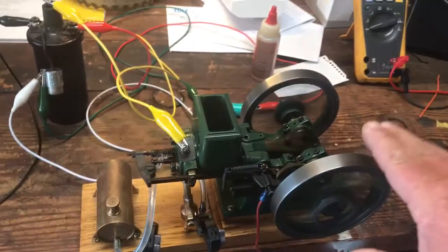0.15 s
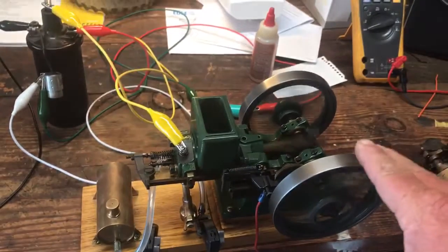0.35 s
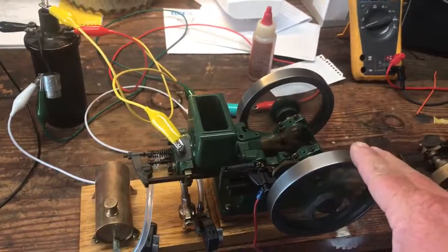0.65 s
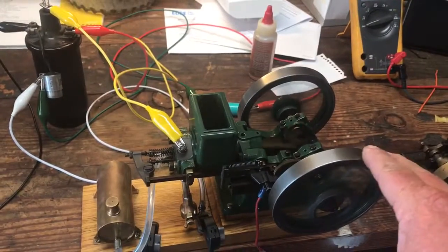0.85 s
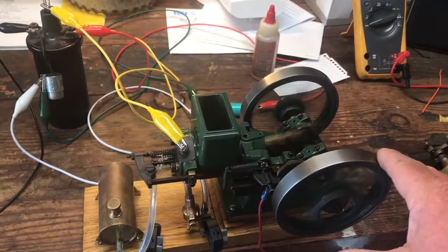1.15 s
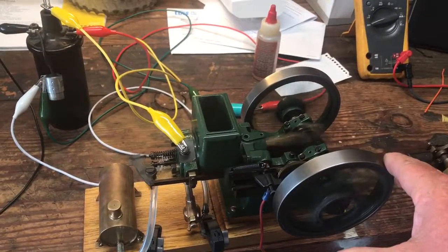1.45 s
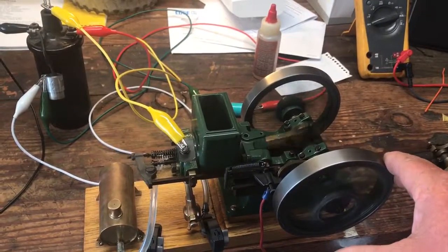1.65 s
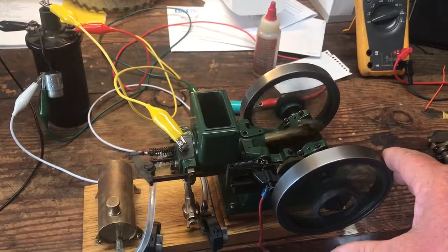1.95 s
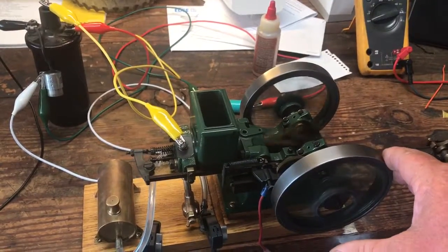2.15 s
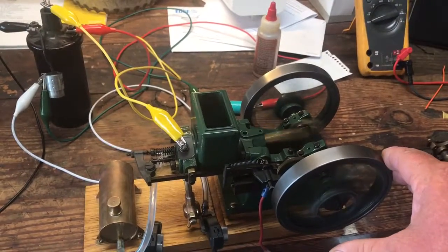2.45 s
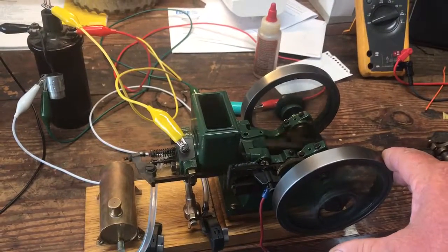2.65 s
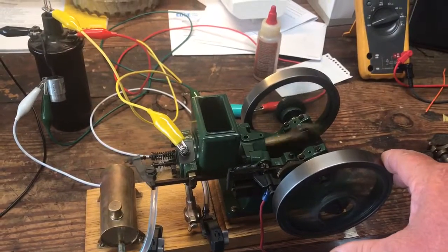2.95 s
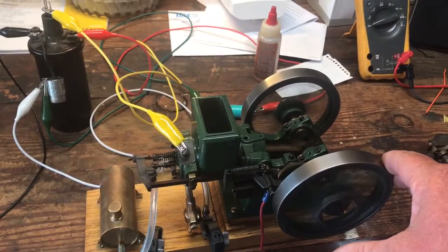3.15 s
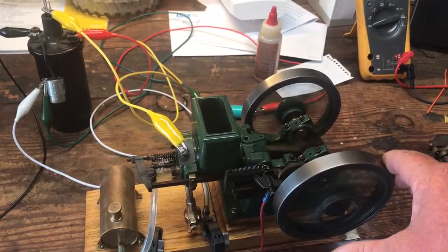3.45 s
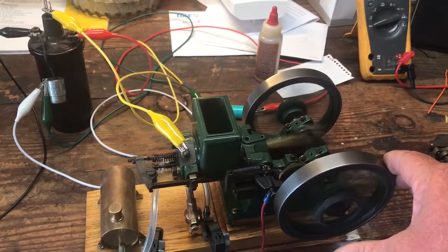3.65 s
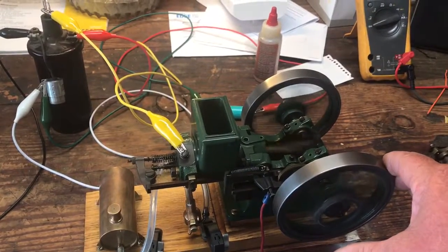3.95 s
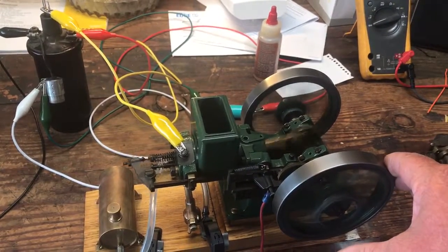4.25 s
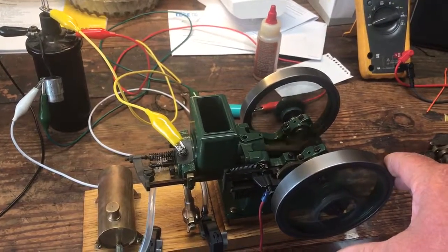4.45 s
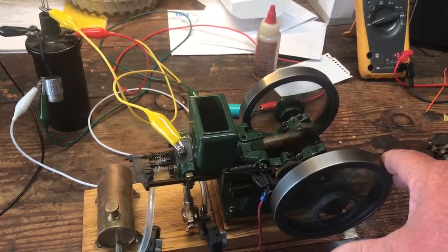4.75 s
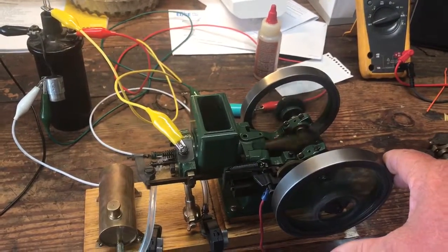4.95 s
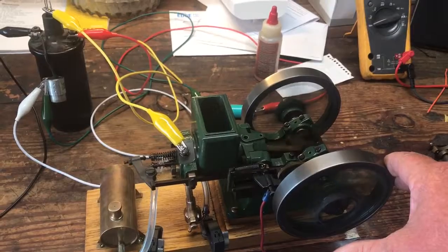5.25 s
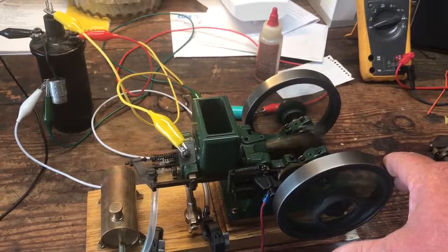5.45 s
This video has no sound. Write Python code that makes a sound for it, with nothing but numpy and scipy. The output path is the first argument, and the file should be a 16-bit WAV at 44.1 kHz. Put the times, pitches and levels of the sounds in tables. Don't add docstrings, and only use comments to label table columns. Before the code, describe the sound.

Close phone pickup in a small, dry workshop: a little hit-and-miss gas engine already turning on a wooden bench. From 0 s, hard metallic clacks arrive about every 0.11 s, each trailed some 25 ms later by a softer valve seating, with light loose ticks between. At 0.7 s comes the first firing: a very short, bright, hissing double puff with a piston knock and a low bench-and-pipe thump. The next is at 1.25 s, then 1.6, 1.9 and 2.15 s, and so on roughly every 0.22-0.35 s to 5.4 s, varying slightly in strength. Near 3.3 s and 5.56 s the latch slips with an extra rattly clack and a weak thump; another weak thump comes at 3.38 s. Throughout, the piston breathes falling chuffs and faint rising whistles, an intake valve hums briefly after firings, and grainy gear whirr, thin high hiss and quiet rumble continue until it cuts off, still running, around 5.6 s.

```python
import sys
import numpy as np
from scipy import signal
from scipy.fft import rfft, irfft
from scipy.io import wavfile
from scipy.ndimage import uniform_filter1d

SR = 44100
rng = np.random.default_rng(int(sys.argv[2]) if len(sys.argv) > 2 else 0)


def bounce(signal):
    frames = np.transpose(np.atleast_2d(signal))
    limited = np.clip(frames, -1, 1)
    pcm = np.round(limited * 32767).astype(np.int16)
    wavfile.write(sys.argv[1], SR, pcm)


def convert_level_to_amplitude(level_db):
    exponent = np.asarray(level_db, float) / 20
    return 10 ** exponent


N = 246947


def evened(x):
    return x / np.sqrt(np.mean(x ** 2) + 1e-20)


def read(points, hz):
    f, value = np.transpose(points)
    return np.interp(np.log(hz + 1), np.log(f + 1), value)


def add(mix, s, sound):
    part = mix[..., round(s * SR):][..., :sound.shape[-1]]
    part += sound[..., :part.shape[-1]]


def swell(rise_s, fall_s, length=4000):
    t = np.arange(length) / SR
    shape = (1 - np.exp(-t / rise_s)) ** 2 * np.exp(-t / fall_s)
    return shape / shape.max()


def band(x, lo_hz, hi_hz):
    return signal.sosfilt(signal.butter(4, [lo_hz, hi_hz], "band", fs=SR, output="sos"), x)


def coloured(points):
    length = N + N % 2
    spectrum = rfft(rng.standard_normal(length))
    spectrum *= convert_level_to_amplitude(read(points, np.fft.rfftfreq(length, 1 / SR)))
    return evened(irfft(spectrum)[:N])


def modes(table, length=12000):
    t = np.arange(length) / SR
    return sum(convert_level_to_amplitude(db - 60 * t / t60) * np.sin(2 * np.pi * hz * t) for hz, db, t60 in table)


# (time [s], first puff [dB], second puff [dB], thump [dB])
FIRINGS = [(0.7047, -7.5, -11, -29.5), (1.2472, -7, -12.5, -28.5), (1.5827, -9, -11, -30),
           (1.9287, -6.5, -12.5, -28.5), (2.1517, -7, -11, -28), (2.4811, -8.5, -12.5, -27.5),
           (2.816, -7, -12.5, -28.5), (3.1549, -11.5, -12.5, -26.5), (3.5082, -8, -12, -28),
           (3.735, -13, -10.5, -28.5), (4.0677, -10.5, -11, -27.5), (4.4018, -6.5, -13.5, -27.5),
           (4.7377, -8, -11.5, -29), (5.0745, -7, -12, -27.5), (5.4174, -11, -10.5, -27.5)]
# (time [s], level [dB])
THUMPS = [
    (3.3055, -15),
    (3.3815, -11),
    (5.561, -15),
]
# (pitch [Hz], level per Hz [dB])
JET = [(590, -5.5), (1000, -5.5), (2770, -4.5), (4540, 1.5), (6380, -3), (8360, -2), (10100, -8),
       (11600, -0.5), (15400, -2), (15900, 10), (16500, -22)]


def exhaust():
    first, second, low, rumble = np.zeros((4, N))
    thump = convert_level_to_amplitude(8.5) * gas_swing()
    first_puff = swell(.0007, .0016)
    blow_down = convert_level_to_amplitude(-15) * swell(0.00088, 0.026)
    second_puff = swell(0.00071, 0.0024) + blow_down
    for s, first_db, second_db, thump_db in FIRINGS:
        add(first, s - .0001, convert_level_to_amplitude(first_db) * first_puff)
        add(second, s + 0.0035, convert_level_to_amplitude(second_db) * second_puff)
        add(low, s - .008, -convert_level_to_amplitude(thump_db - 4.5) * np.hanning(250))
        add(low, s + .0017, convert_level_to_amplitude(thump_db) * thump)
        add(rumble, s + 0.0047, convert_level_to_amplitude(thump_db - 13.5) * swell(0.0025, 0.038, 9000))
    for s, db in THUMPS:
        add(low, s, convert_level_to_amplitude(db) * np.diff(thump[:330]))
    low += rumble * evened(band(rng.standard_normal(N), 77, 274))
    gusts = evened(uniform_filter1d(rng.standard_normal(N), 40))
    jet = coloured(JET) * convert_level_to_amplitude(1.35 * gusts - 2)
    thin_jet = 0.45 * jet + 0.8 * band(jet, 4050, 16700)
    return first * jet + second * thin_jet + low + piston_knocks()


def piston_knocks():
    rows = [(s + 0.00208, db, 5, -9) for s, _, _, db in FIRINGS]
    knock = contact_forces(rows, swell(0.00011, 0.00059), likeness=1.0)
    return frame(*knock, ring_db=[-3] * 3, click_db=[1.5] * 3, tail_db=[-1.5] * 3)


# (pitch [Hz], level against the gas swing [dB], time to fall 60 dB [s])
CHEST = [
    (75.6, -13.5, .25),
    (106.5, -8.5, 0.15),
    (168, -38, 0.16),
    (223, -16.5, 0.06),
]
# (pitch [Hz], peak against the gas swing [dB], rise [s], fall [s])
PIPE = (518, -5, .0025, .0042)
# (time [s], level [dB])
WALLS = [
    (0.02, -25),
    (.034, -25),
    (.047, -18),
]


def gas_swing():
    swing_hz = 245
    t = np.arange(round(1.5 * SR / swing_hz)) / SR
    swing = -np.sin(2 * np.pi * swing_hz * t) * np.linspace(.75, 1.05, len(t))
    out = np.zeros(17000)
    add(out, 0, swing)
    add(out, .0046, -modes(CHEST, 16000))
    hz, db, rise_s, fall_s = PIPE
    pipe_tone = np.sin(2 * np.pi * hz * np.arange(4000) / SR)
    add(out, .0007, -convert_level_to_amplitude(db) * swell(rise_s, fall_s) * pipe_tone)
    dull = band(out, 70, 321)
    for s, db in WALLS:
        add(out, s, convert_level_to_amplitude(db) * dull)
    return out


def valve_gear():
    hard = contact_forces(clacks(), swell(.0002, .0008), likeness=.6)
    soft = contact_forces(rattles(), swell(.0005, .0018), likeness=.3)
    hard_ring = frame(*hard, ring_db=[6, 1.5, -8], click_db=[4, 4, .6], tail_db=[3, -1.5, -4])
    soft_ring = frame(*soft, ring_db=[-1.5, -5, -11], click_db=[3, 1.5, -3], tail_db=[-3, -5, -7])
    return hard_ring + soft_ring


# (time [s], clack [dB], valve seating delay [ms], seating [dB])
CLACKS = [(0.0448, -19, 25, -28), (0.1491, -17.5, 23.5, -27), (0.2541, -19, 27, -25.5),
          (0.3646, -19.5, 25, -23), (0.4761, -19, 25.5, -26), (.8046, -21, 25.4, -36),
          (.908, -19, 24.5, -24.5), (1.016, -19.5, 26, -25.5), (1.3524, -19, 26, -27),
          (1.69, -23, 26.7, -26.5), (2.255, -22.5, 25, -26.5), (2.586, -18.5, 26.5, -26),
          (2.9214, -21, 27, -28), (3.2638, -20, 30, -27), (3.84, -22, 27, -25), (4.1734, -21, 25, -26.5),
          (4.5075, -21, 27, -25), (4.8439, -20.5, 26.5, -24.5), (5.1812, -20, 27, -27),
          (5.5274, -21, 24.9, -44)]
# (time [s], clack [dB], valve seating delay [ms], seating [dB])
CHARGES = [(.5902, -19, 28.4, -29), (1.13, -20.5, 25.8, -37), (1.4649, -20, 26.5, -33),
           (1.8058, -19, 26.7, -38), (2.0379, -21.5, 30.3, -27.5), (2.3668, -19.5, 24.8, -28.5),
           (2.6982, -19.5, 26.2, -31), (3.0357, -20.5, 26.3, -36), (3.3816, -45, 35.8, -40),
           (3.6194, -20, 27.1, -34), (3.9525, -18.5, 25.6, -31.5), (4.2858, -18.5, 25, -29.5),
           (4.6196, -19, 27.2, -33), (4.956, -20, 26.3, -32), (5.2958, -19.5, 27.2, -33.5)]
# (time [s], middle ring [dB], low ring against it [dB], high ring against it [dB])
SLIPS = [
    (3.3062, -29, -12, 3),
    (3.3093, -14.5, -14, 4),
    (3.3135, -21, -6, 0),
    (3.3807, -44, 6, 13),
    (5.5615, -31, -8, 3),
    (5.5641, -16.5, -7, 6),
]


def clacks():
    coast_colour, charge_colour = (-4, 0.78), (-5, 0.49)
    coasting = [(s, db, *coast_colour) for s, db, *_ in CLACKS]
    charging = [(s, db, *charge_colour) for s, db, *_ in CHARGES]
    return sorted(coasting + charging + SLIPS)


RATTLES = {"coasting": [(.59, -56, 4, -4), (.655, -45.5, 6, 9.5), (.91, -53, 0, 16)],
           "charging": [(.2, -50, -8, 0), (.55, -40, -3, -14), (.76, -48.5, 6, -8), (.807, -42, 10.5, 5)],
           "firing": [(.662, -37.5, 1, 1.6), (.91, -48, -9, 6.1)]}


def rattles():
    cold_seat, hot_seat, charge_seat, fired_seat = (-3.5, -2.1), (-10, -3), (3.5, .6), (-5, -5)
    fired_lag_s, fired_seat_db = 0.0265, -25.5
    bounce_s, bounce_db = 0.0046, -6
    fired_s = np.array([row[0] for row in FIRINGS])
    seats = [(s + fired_lag_s, fired_seat_db, *fired_seat) for s in fired_s]
    for s, _, lag_ms, db in CLACKS:
        hot = np.any((s > fired_s) & (s < fired_s + .15))
        seats.append((s + lag_ms / 1000, db, *(hot_seat if hot else cold_seat)))
    for s, _, lag_ms, db in CHARGES:
        seat_s = s + lag_ms / 1000
        seats.append((seat_s, db, *charge_seat))
        seats.append((seat_s + bounce_s, db + bounce_db, *charge_seat))

    turns, ticks = cam_turns()[0], []
    for kind, table in (("coasting", CLACKS), ("charging", CHARGES), ("firing", FIRINGS)):
        opened = np.round(turns[[round(row[0] * SR) for row in table]])
        for share, *levels in RATTLES[kind]:
            ticks += [(at / SR, *levels) for at in np.searchsorted(turns, opened + share)]
    ticks = ticks + rng.standard_normal((len(ticks), 4)) * [0.0011, 0.5, 0.5, 0.5]
    seats = seats + rng.standard_normal((len(seats), 4)) * [0, 0, 0.4, 0.4]
    return np.concatenate([seats, ticks])


def contact_forces(rows, shape, likeness):
    envelope, same = np.zeros((3, N)), np.zeros((3, N))
    pattern = rng.standard_normal(len(shape))
    for s, mid_db, low_db, high_db in rows:
        blow = convert_level_to_amplitude(mid_db + np.array([[low_db], [0], [high_db]])) * shape
        add(envelope, s, blow)
        add(same, s, blow * pattern)
    fresh = envelope * rng.standard_normal(N)
    return envelope, likeness * same + np.sqrt(1 - likeness ** 2) * fresh


RING_EDGES_HZ = [800, 2500, 7000, 16000]
# (pitch [Hz], level [dB], time to fall 60 dB [s])
FRAME = [(961, 4.5, 0.19), (1159, 7, 0.19), (1474, 10.5, 0.21), (1541, 22.5, 0.049), (1694, 18.5, 0.06),
         (1750, 25.5, 0.019), (2170, 19.5, 0.017), (2493.5, 20.5, 0.02), (2680, 17.5, 0.012),
         (2950, 8, 0.019), (3900, -12, 0.046), (3687, 11, 0.05), (3974, 17, 0.023), (4200, 13, 0.035),
         (5460, 18.5, 0.0061), (5980, 12, 0.014), (8960, -22, 0.013), (9550, 13, 0.039),
         (11500, 17.5, 0.018), (13100, 22.5, 0.011)]
# (pitch [Hz], level per Hz [dB])
SCATTER = [(290, -44), (500, -47), (1120, 0), (1290, -9), (1480, 3.5), (2260, -8.5), (2460, -9),
           (2890, -16.5), (3770, 3.5), (4760, -16.5), (5670, -8), (7710, -30.5), (14500, -23), (15800, -29),
           (16500, -35)]
SCATTER_S = [0.0095, 0.0069, 0.0042]


def frame(blows, roughs, ring_db, click_db, tail_db):
    out = np.zeros(N)
    for k, force in enumerate(blows):
        lo, hi = RING_EDGES_HZ[k:k + 2]
        rough = roughs[k]
        ringing = modes([m for m in FRAME if lo <= m[0] < hi])
        ringing /= np.linalg.norm(ringing)
        out += convert_level_to_amplitude(ring_db[k]) * band(signal.oaconvolve(rough, ringing)[:N], lo, hi)
        out += convert_level_to_amplitude(click_db[k]) * band(rough, max(lo, 1200), hi)
        fall = swell(0.00028, SCATTER_S[k]) ** 2
        spread = np.sqrt(abs(signal.oaconvolve(force ** 2, fall / fall.sum())[:N]))
        out += convert_level_to_amplitude(tail_db[k]) * spread * evened(band(coloured(SCATTER), lo, hi))
    return out


def cam_turns():
    blows = np.sort([row[0] for row in CLACKS + CHARGES + FIRINGS])
    starts = blows[np.diff(blows, prepend=-1) > .06]
    starts = np.concatenate([[starts[0] - .105], starts, [starts[-1] + .115]])
    fired = np.isin(starts, [row[0] for row in FIRINGS])
    return np.interp(np.arange(N) / SR, starts, np.arange(len(starts))), fired


def resonate(x, hz, width_hz):
    spin = np.exp(2j * np.pi * np.cumsum(hz) / SR)
    r = np.exp(-np.pi * width_hz / SR)
    smooth = signal.lfilter([(1 - r) ** 2], [1, -2 * r, r * r], x / spin)
    return 2 * (spin * smooth).real


# (share of the turn [0-1], pitch [Hz], level [dB])
PUMP_DOWN = [(0, 1300, -68), (.1, 1190, -47), (.25, 926, -45.5), (.4, 783, -42.5), (.55, 660, -53.5),
             (.62, 560, -58), (.7, 543, -68), (1, 540, -58)]
# (share of the turn [0-1], pitch [Hz], level [dB])
PUMP_UP = [(0, 1700, -80), (.62, 1720, -96), (.7, 1750, -68), (.82, 1940, -59), (.9, 2000, -55),
           (.97, 2040, -69), (1, 2050, -65)]


def pumping():
    turns, fired = cam_turns()
    whole = np.minimum(turns.astype(int), len(fired) - 2)
    gusts = evened(uniform_filter1d(rng.standard_normal(N), 120))
    rough = rng.standard_normal(N) * convert_level_to_amplitude(4 * np.clip(gusts, -2, 1.5))
    share, hz, db = np.transpose(PUMP_DOWN)
    down = evened(resonate(rough, np.interp(turns % 1, share, hz), 640))
    down *= convert_level_to_amplitude(np.interp(turns % 1, share, db) + 5.7 * fired[whole])
    share, hz, db = np.transpose(PUMP_UP)
    up_hz = np.interp(turns % 1, share, hz)
    up = evened(resonate(rough, up_hz, 230) + 0.64 * resonate(rough, 1.704 * up_hz, 360))
    up *= convert_level_to_amplitude(np.interp(turns % 1, share, db) + 12.7 * fired[whole + 1])
    return down + up


def intake():
    flutter = np.zeros(N)
    clack_s = np.array([row[0] for row in clacks()])
    for s, *_ in FIRINGS[1:]:
        next_clack_s = clack_s[clack_s > s + .08][0]
        add(flutter, next_clack_s + .024, signal.windows.tukey(1100, .6))
    wobble_hz = 722 + 12 * evened(uniform_filter1d(rng.standard_normal(N), 900))
    return convert_level_to_amplitude(-38.5) * flutter * np.sin(2 * np.pi * np.cumsum(wobble_hz) / SR)


# (pitch [Hz], level per Hz [dB])
WHIRR = [(15, -48), (25, -5), (80, 9), (368, -7.5), (726, -2.5), (1360, -2.5), (1510, 2), (3230, -7.5),
         (3810, -1), (4730, -7.5), (12600, -16.5), (15200, -10), (16500, -27)]
# (time [s], gear whirr [dB], intake hiss [dB])
LOAD = [(0, -39.5, -39.5), (.5, -43, -40.5), (.75, -42, -47), (1.1, -42, -41), (1.6, -44, -46),
        (3.3, -43.5, -43.5), (3.6, -44, -45), (5.5, -43.5, -43), (5.6, -40, -48)]
# (share of the turn [0-1], gear whirr [dB], valve hiss [dB])
TURN = [(0, -5, -6), (.12, 1.5, -13), (.26, 12, 1), (.38, 5, 9.5), (.52, 0, -10), (.66, 4, 8),
        (.78, -2.5, -10), (.87, -2.5, 12.5), (1, -1.5, -8)]


def whirr():
    s, whirr_db, hiss_db = np.transpose(LOAD)
    share, turn_whirr_db, turn_hiss_db = np.transpose(TURN)
    t, turn = np.arange(N) / SR, cam_turns()[0] % 1

    hits = rng.random(N) < 500 / SR
    teeth = convert_level_to_amplitude(3 * np.minimum(rng.exponential(1, N), 4)) * hits
    grain = evened(signal.oaconvolve(teeth, swell(0.00049, 0.0035, 660))[:N])
    steady = coloured(WHIRR) * convert_level_to_amplitude(-44.5)
    gears = band(steady, 580, 22000) * (0.43 + 0.56 * grain)
    gears *= convert_level_to_amplitude(np.interp(t, s, whirr_db) + np.interp(turn, share, turn_whirr_db) + 44)

    air = rng.standard_normal(N)
    hiss = band(air, 11200, 14700) + 1.1 * band(air, 11200, 12400)
    hiss += .9 * band(air, 12900, 13400) + .7 * band(air, 13800, 14200)
    hiss = evened(hiss)
    hiss *= convert_level_to_amplitude(np.interp(t, s, hiss_db) + np.interp(turn, share, turn_hiss_db) - 9.5)

    hum = convert_level_to_amplitude(-61.5 + 3.1 * (t < .7)) * evened(band(rng.standard_normal(N), 222.7, 256.3))
    rumble = convert_level_to_amplitude(-54) * evened(band(air, 11, 52))
    return rumble + band(steady, 20, 550) + hum + gears + hiss


# (pitch [Hz], time to fall 60 dB [s])
SHOP = [(100, 0.074), (1000, 0.15), (4000, 0.078), (10000, 0.08), (16000, 0.021)]


def shop(x):
    taps = np.zeros(SR // 2)
    at = np.arange(200, SR // 2 - 20, 20)
    taps[at + rng.integers(0, 20, len(at))] = rng.choice([-1., 1.], len(at))
    hz, t, z = signal.stft(taps, SR, nperseg=256)
    fade = convert_level_to_amplitude(-60 * t / read(SHOP, hz)[:, None])
    tail = signal.istft(z * fade, SR, nperseg=256)[1]
    return signal.fftconvolve(x, tail / np.linalg.norm(tail))[:N]


def scene():
    engine = valve_gear() + exhaust()
    return (engine + convert_level_to_amplitude(-14.0) * shop(engine) + intake() + pumping() + whirr())[None]


def roll_off(x):
    return signal.sosfilt(signal.butter(12, 17090, fs=SR, output="sos"), x)


def record(dry):
    thin = signal.sosfilt(signal.butter(2, 75, "high", fs=SR, output="sos"), dry)
    soft = .95 * np.tanh(thin / .95)
    edge = signal.firwin(301, 15900, window=("kaiser", 5), fs=SR)
    mix = signal.oaconvolve(soft, edge[None], "same")
    return roll_off(mix)


dry = scene()
out = record(dry)
bounce(out)
```